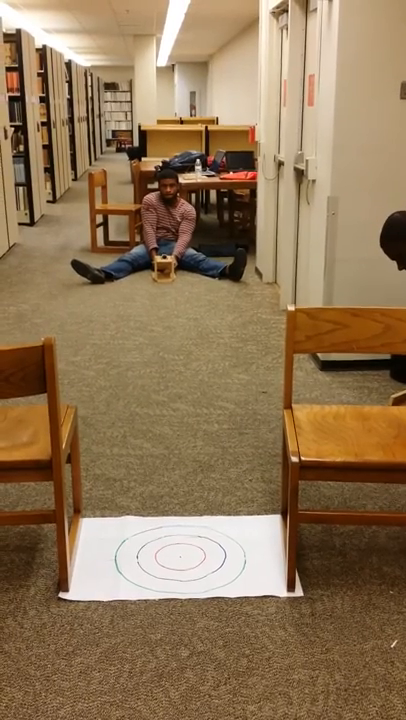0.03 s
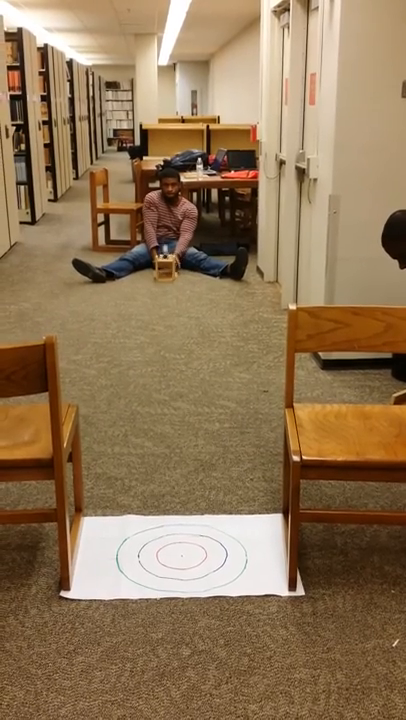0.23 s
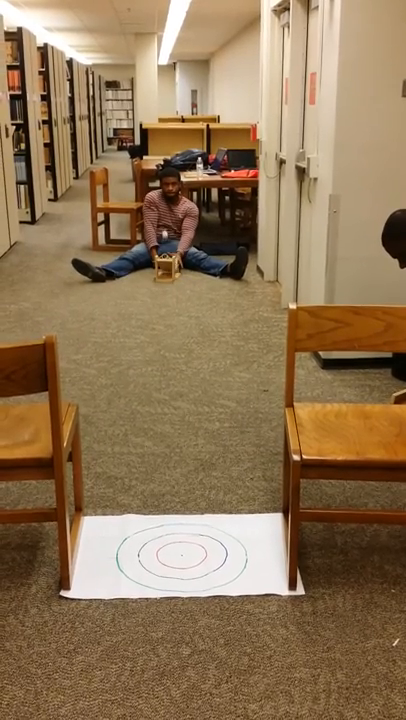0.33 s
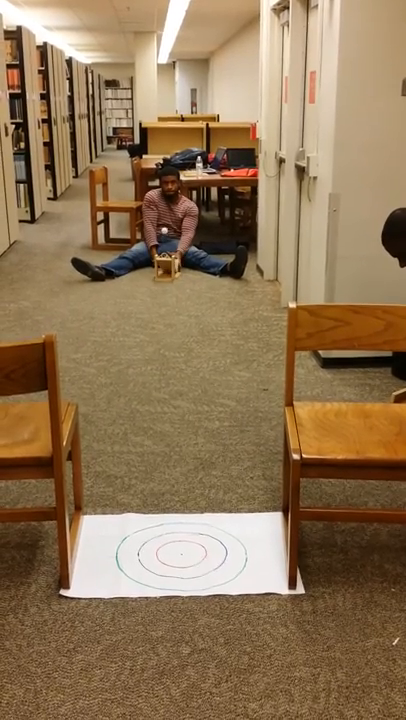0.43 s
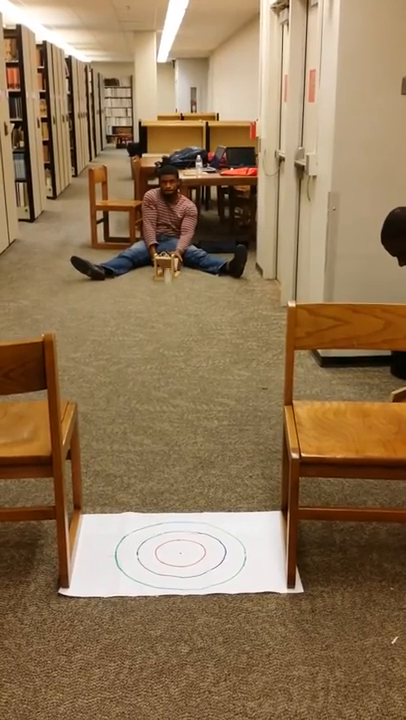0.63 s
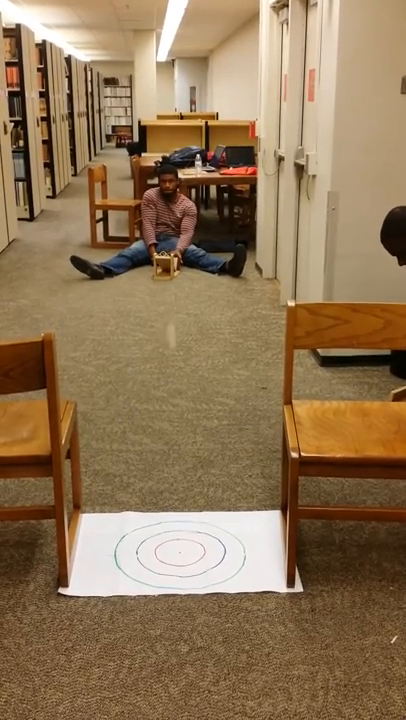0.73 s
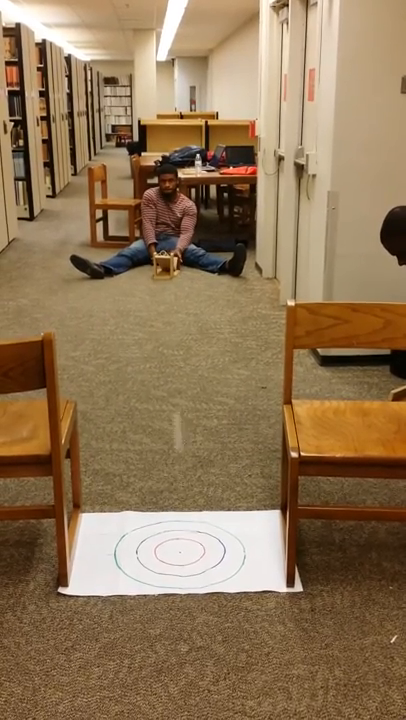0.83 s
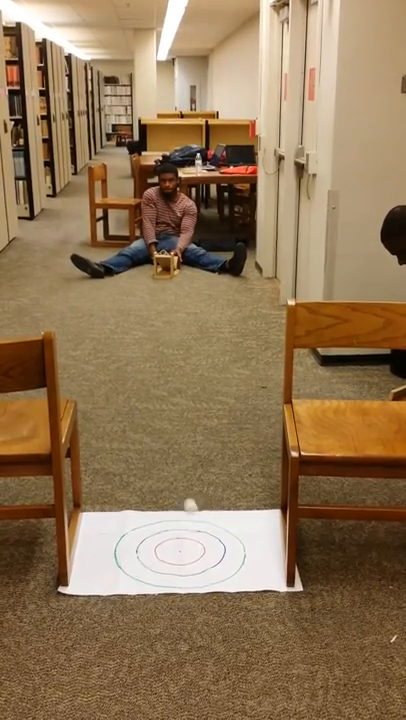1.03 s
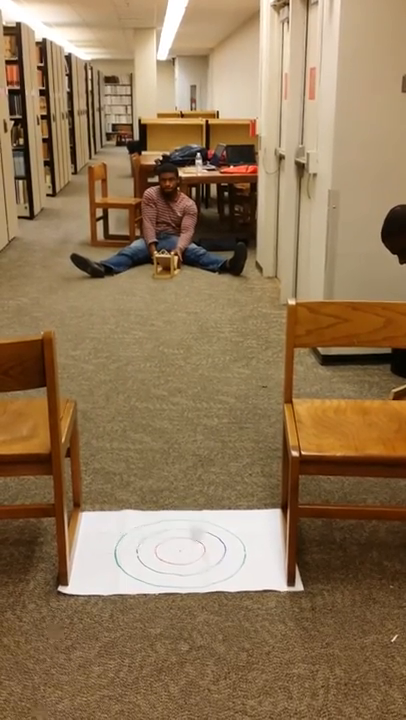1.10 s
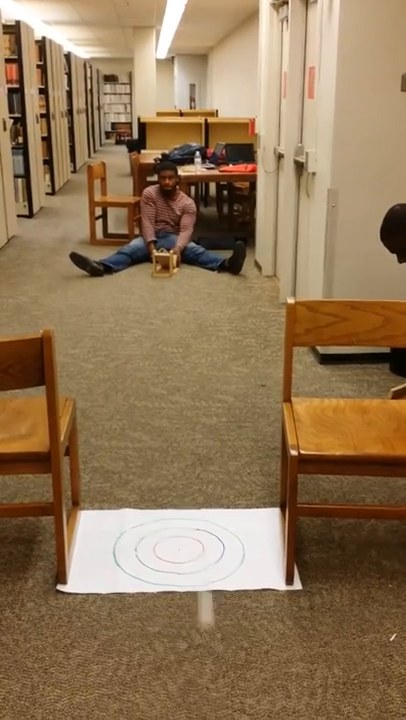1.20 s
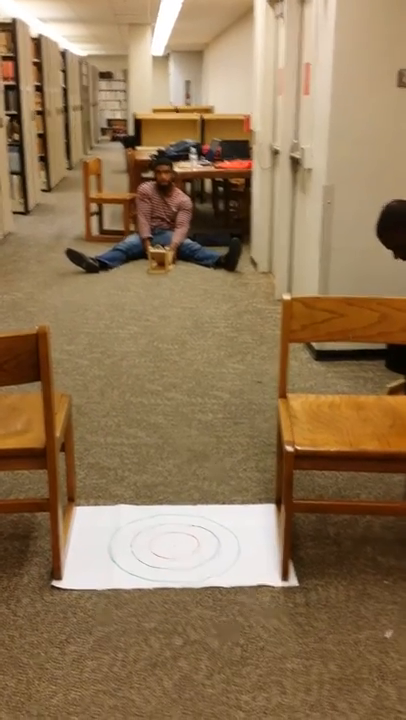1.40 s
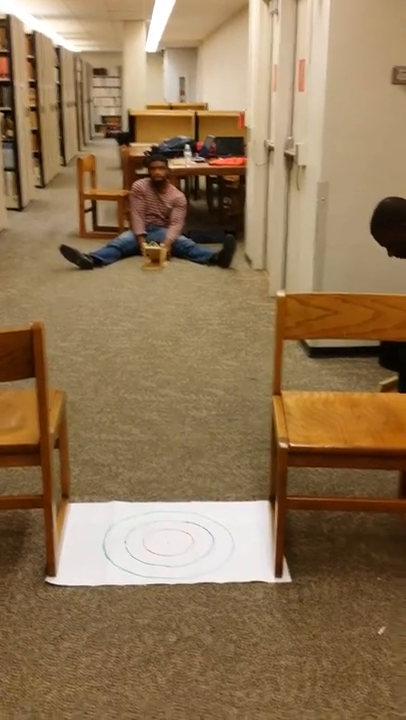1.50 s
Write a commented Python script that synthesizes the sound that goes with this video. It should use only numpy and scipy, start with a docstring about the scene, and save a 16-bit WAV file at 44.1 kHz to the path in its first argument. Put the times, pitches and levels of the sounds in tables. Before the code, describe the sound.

Sharp wooden catapult snap, a dull knock, then two soft ball bounces in a quiet room.

```python
"""Low ventilation rumble in a carpeted library aisle, then soft knocks as a small wooden catapult lets go.
The arm rubs as it swings, cracks against its stop and chatters; the wood rings. The frame drops back
with a dull knock and a low boom. The light ball lands close by and bounces once more, and a faint
rustle comes up at the end. Shelves and walls answer the hits with reflections and a diffuse tail."""
import sys
import numpy as np
from scipy import signal
from scipy.fft import rfft, irfft
from scipy.io import wavfile

SR = 44100
rng = np.random.default_rng(int(sys.argv[2]) if len(sys.argv) > 2 else 0)


def to_wav(sig):
    """Store sig (one row per channel, or 1-D mono) as 16-bit WAV at the path in sys.argv[1].

    Samples outside -1..1 are clipped; the rate is SR.
    """
    pcm = np.clip(np.atleast_2d(sig), -1, 1) * 32767
    pcm = np.round(pcm).astype(np.int16)
    wavfile.write(sys.argv[1], SR, pcm.T)  # frames by channels


N = 68355
T = np.arange(N) / SR
HZ = np.arange(N + 1) * SR / (2 * N)


def undb(db):
    """Decibels to gain."""
    return 10 ** (np.asarray(db) / 20)


def along(points, hz=HZ):
    """Interpolate (Hz, value) points on a log-frequency axis."""
    freqs, values = np.array(points).T
    return np.interp(np.log(hz + 1e-9), np.log(freqs), values)


def convolve(a, b):
    """Play a through the response b."""
    return irfft(rfft(a, 2 * N) * rfft(b, 2 * N))[..., :N]


def shape(x, gain):
    """Filter by a gain per frequency."""
    return irfft(rfft(x, 2 * N) * gain)[..., :N]


def pulse(spectrum):
    """Minimum-phase pulse with this (Hz, dB) spectrum."""
    cepstrum = irfft(np.log(undb(along(spectrum))))[:N]
    causal = cepstrum * np.where(T > 0, 2, 1)
    return irfft(np.exp(rfft(causal, 2 * N)))[:N]


def fade(t60_s, t=T):
    """Exponential decay."""
    return np.exp(-np.log(1000) * t / t60_s)


def impulses(rows):
    """One impulse per (s, dB) row."""
    out = np.zeros(N)
    for time_s, db in rows:
        out[int(time_s * SR)] += undb(db)
    return out


def pan(x, right_db):
    """Set the right side this far above the left."""
    return x * undb(np.array([[-right_db], [right_db]]) / 2)


def ring(modes, attack_s=.002):
    """Decaying (Hz, dB, t60) modes, with a random phase on each side."""
    notes = sum(undb(db) * fade(t60_s) * np.sin(2 * np.pi * hz * T + rng.normal(0, 1, (2, 1)))
                for hz, db, t60_s in modes)
    return notes * (1 - np.exp(-T / attack_s))


# Left-right likeness of diffuse sound (frequency [Hz], correlation [-1..1])
CORRELATION = [(60, 1), (200, 1), (500, 0.9), (1200, -0.073), (5000, .05), (14000, -.1)]
def diffuse():
    """Stereo noise, alike in the bass and unrelated in the treble."""
    mid, side = rng.standard_normal((2, N))
    correlation = along(CORRELATION)
    mid = shape(mid, np.sqrt((1 + correlation) / 2))
    side = shape(side, np.sqrt((1 - correlation) / 2))
    return np.array([mid + side, mid - side])


def burst(t60_s):
    """Decaying noise of unit energy."""
    return diffuse() * fade(t60_s) / np.linalg.norm(fade(t60_s))


# Ventilation noise (frequency [Hz], relative density [dB])
VENT_SPECTRUM = [(20, -18), (48, -13.5), (78, -2), (118, -4), (160, -11.5), (235, -8.5), (310, -13),
                 (440, -21.5), (750, -23.5), (1300, -30.5), (2600, -36), (5000, -40), (8000, -41),
                 (13000, -38), (15000, -42)]
def ventilation(level_db=-60, waver_db=.5):
    """Steady rumble and faint hiss that waver a little."""
    air = shape(diffuse(), undb(along(VENT_SPECTRUM)))
    waver = np.interp(T, np.linspace(0, T[-1], 12), rng.standard_normal(12))
    return air / air.std() * undb(level_db + waver_db * waver)


# Room decay (frequency [Hz], t60 [s])
ROOM_DECAY = [(80, 1.8), (250, 0.62), (500, 0.46), (1200, 0.31), (2500, 0.34), (6000, 0.22), (12000, 0.2)]
def room_tail(db, hold_s, t60_scale=1, build_s=.0014):
    """Diffuse room sound that builds, holds, then dies sooner in the treble."""
    noise, tail = diffuse(), 0
    centres_hz = np.geomspace(60, 15360, 9)
    decay_time_s = np.maximum(T - hold_s, 0)
    for hz, weights in zip(centres_hz, np.eye(len(centres_hz))):
        band = shape(noise, along(list(zip(centres_hz, weights))))
        tail = tail + band * fade(t60_scale * along(ROOM_DECAY, hz), decay_time_s)
    return undb(db) * tail * (1 - np.exp(-T / build_s)) / np.sqrt(.06 * SR)


def early_paths(echoes, direct_s=.0011, jitter_s=.0002, left_lag_s=.00006):
    """Direct sound plus shelf and wall reflections, timed a little differently on each side."""
    left, right = [impulses([(direct_s, 0)] + [(s + rng.normal(0, jitter_s), db) for s, db in echoes])
                   for side in range(2)]
    return np.array([shape(left, np.exp(-2j * np.pi * HZ * left_lag_s)), right])


# Reflections of the catapult (delay [s], level [dB])
CATAPULT_ECHOES = [(.0075, -9), (.0160, -15.5), (.0245, -18.5), (.0455, -7)]
def far_paths(low_cut_hz=380):
    """Early paths from the far catapult, whose bass arrives mostly through the room tail."""
    highpass = signal.butter(2, low_cut_hz, "high", fs=SR, output="sos")
    return pan(signal.sosfilt(highpass, early_paths(CATAPULT_ECHOES)), right_db=1.5)


# Rustle envelope (time [s], level [dB])
RUSTLE_ENVELOPE = [(1.40, -94), (1.50, -65.5), (1.55, -67.5)]
# Rustle noise (frequency [Hz], relative level [dB])
RUSTLE_SPECTRUM = [(60, -4.5), (220, 11), (500, -1.5), (2000, -10), (7000, -10), (14000, -19.5)]
def rustle():
    """Soft, close rubbing noise at the end."""
    noise = shape(diffuse(), undb(along(RUSTLE_SPECTRUM)))
    envelope_db = np.interp(T, *np.array(RUSTLE_ENVELOPE).T)
    return noise / noise.std() * undb(envelope_db)


# Bass swells (time [s], relative level [dB])
BOOM_ONSETS = [(.366, -44), (.478, -47)]
def boom(centre_hz=78.5, sigma_hz=18, rise_s=.011):
    """Narrow-band bass swells as the frame lands, swells again and ebbs."""
    bass = shape(diffuse(), np.exp(-.5 * ((HZ - centre_hz) / sigma_hz) ** 2))
    swell = (1 - np.exp(-T / rise_s)) * fade(t60_s=1.1)
    return .5 * convolve(impulses(BOOM_ONSETS), swell) * bass / bass.std()


# Ball landings (time [s], pat [dB], tick [dB], shell [dB], room [dB])
BALL_BOUNCES = [(0.8846, -8.5, -30.5, -62, 3.5), (1.3370, -12.5, -32, -76, 0)]
# Soft pat (frequency [Hz], level [dB])
PAT_SPECTRUM = [(60, -10), (200, -7), (450, -1.5), (750, 2.5), (1300, -5), (2200, -16), (3200, -33),
                (14000, -40)]
# Contact tick (frequency [Hz], level [dB])
TICK_SPECTRUM = [(500, 8.5), (3000, -7.5), (4600, -1), (6000, -5), (8200, 1), (9100, 4.5), (10800, 1),
                 (12500, 4), (13800, 0), (15000, -10)]
# Thin shell's resonances (frequency [Hz], level [dB], t60 [s])
BALL_MODES = [(9250, -2.5, 0.12), (9850, -3, 0.069), (12300, 0, .06)]
# Reflections of the near ball (delay [s], level [dB])
BALL_ECHOES = [(.0056, -6), (.0095, -18), (.0128, -16)]
def ball():
    """Each bounce is a soft pat with a thin tick and a faint ring from the shell."""
    out = 0
    for time_s, pat_db, tick_db, shell_db, room_db in BALL_BOUNCES:
        tick = undb(tick_db) * convolve(burst(t60_s=.013), pulse(TICK_SPECTRUM))
        pat = -undb(pat_db) * pulse(PAT_SPECTRUM)
        paths = early_paths(BALL_ECHOES) + room_tail(room_db, hold_s=.023, t60_scale=.49)
        shell = undb(shell_db) * ring(BALL_MODES)
        out = out + convolve(impulses([(time_s, 0)]), convolve(tick + pat, paths) + shell)
    return out


# Frame edges landing in turn (time [s], level [dB])
FRAME_HITS = [(.3629, 10.5), (.3646, 16.5)]
# Cushioned knock (frequency [Hz], level [dB])
FRAME_SPECTRUM = [(60, -32), (150, -21.5), (230, -14), (300, -6), (390, -8), (520, 0.5), (850, 0.5),
                  (1250, 0.5), (1800, -10), (2500, -19.5), (4000, -49.5), (14000, -80.5)]
def frame_drop(buzz_db=-3):
    """The frame knocks on the carpet; loose parts buzz with the timbre of the arm's crack."""
    onset = impulses([(FRAME_HITS[0][0], 0)])
    early = convolve(impulses(FRAME_HITS), far_paths())
    late = convolve(onset, room_tail(db=22, hold_s=.013, t60_scale=.91))
    buzz = undb(buzz_db) * convolve(burst(t60_s=.37), pulse(CRACK_SPECTRUM))
    return convolve(early + late, -pulse(FRAME_SPECTRUM)) + convolve(onset, buzz)


# Catch slipping (time [s], relative level [dB])
CATCH_HITS = [(.1835, -10), (.1861, -5.5), (.1965, 0), (.1992, -5.5)]
def catch_release(pitch_hz=744, level_db=-28, attack_s=.00033):
    """The catch lets go with soft wooden knocks on one damped mode."""
    knock = fade(t60_s=.036) * np.sin(2 * np.pi * pitch_hz * T) * (1 - np.exp(-T / attack_s))
    return undb(level_db) * convolve(impulses(CATCH_HITS), knock)


# Jerks of the arm (time [s], level [dB])
ARM_RUBS = [(.1838, -29), (.1905, -16), (.1935, -12.5), (.1985, -15.5), (.2030, -11), (.2075, -14.5)]
# Friction noise (frequency [Hz], level [dB])
RUB_SPECTRUM = [(200, -17.5), (800, 0), (2000, -1), (4000, -1.5), (7000, -6.5), (10000, -7), (14000, -9.5)]
def arm_swing():
    """The arm rubs in short jerks on its way up."""
    jerks = sum(convolve(impulses([row]), burst(t60_s=.025)) for row in ARM_RUBS)
    return convolve(jerks, pulse(RUB_SPECTRUM))


def contacts(rows, click_db=-12):
    """Each hard contact is a click with its own splintery crackle."""
    click = impulses([(0, click_db)])
    return sum(convolve(impulses([row]), click + burst(t60_s=.009)) for row in rows)


# Arm rebounds (time [s], level [dB])
CHATTER_HITS = [(.2190, 8), (.2225, 9), (.2255, 3)]
# Bright rattle (frequency [Hz], level [dB])
CHATTER_SPECTRUM = [(100, -44), (400, -12), (1000, -8.5), (2200, -4), (4500, -5), (6700, 4), (8000, -5.5),
                    (11000, -18), (14500, -21)]
def arm_chatter():
    """The loose arm rattles on the stop, brighter than the first blow."""
    return convolve(contacts(CHATTER_HITS), pulse(CHATTER_SPECTRUM))


# Arm striking the stop (time [s], level [dB])
STOP_HITS = [(.2110, 13.5), (.2125, 13.5), (.2143, 14), (.2158, 7.5)]
# Wooden crack (frequency [Hz], level [dB])
CRACK_SPECTRUM = [(70, -50.5), (130, -14), (200, -8.5), (290, -0.5), (420, -4), (520, 1), (600, -3),
                  (780, 5.5), (1000, -1.5), (1350, 5.5), (1700, -5), (2200, -0.5), (2750, -1.5),
                  (3500, -1.5), (4800, -5.5), (6700, -3.5), (9000, -14), (11500, -22), (14500, -37)]
# Catapult's resonances (frequency [Hz], relative level [dB], t60 [s])
CATAPULT_MODES = [(636.5, -2.5, .2), (675, 1.5, .19), (967, -6, 0.25), (1235, -10, 0.29), (1371, -4, .2),
                  (1432, -4.5, 0.4), (2090, 3, 0.11), (2830, -4, 0.14), (3075, -5, .15), (3440, 0.5, .1),
                  (5430, -5, .12), (6570, -4, 0.077), (6700, -1, 0.18)]
def arm_strike(ring_db=-35.5, hall_db=-12.5, room_hold_s=.037):
    """The arm cracks on its stop; the wood rings, and the room and far end of the hall wash back."""
    onset = impulses([(STOP_HITS[0][0], 0)])
    wash = room_tail(db=21, hold_s=room_hold_s) + undb(hall_db) * burst(t60_s=1.3)
    early = convolve(contacts(STOP_HITS), far_paths())
    crack = convolve(early + convolve(onset, wash), pulse(CRACK_SPECTRUM))
    wood = undb(ring_db) * convolve(impulses(STOP_HITS[:1]), ring(CATAPULT_MODES))
    return crack + wood + convolve(wood, room_tail(db=-13, hold_s=room_hold_s))


def scene():
    """One shot over the ventilation, all a little louder on the right."""
    catapult = catch_release() + arm_swing() + arm_strike() + arm_chatter() + frame_drop()
    return pan(catapult + ball() + boom() + rustle() + ventilation(), right_db=3.5)


def record(dry):
    """Soft peak saturation, then a steep treble cut."""
    cutoff_hz = 14700
    lowpass = signal.ellip(8, .2, 70, cutoff_hz, fs=SR, output="sos")
    return signal.sosfilt(lowpass, np.tanh(dry))


dry = scene()
out = record(dry)
to_wav(out)
```